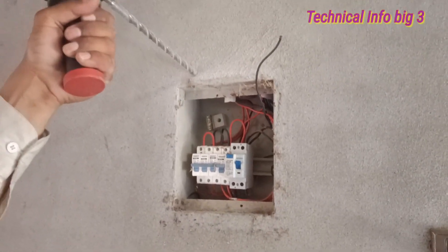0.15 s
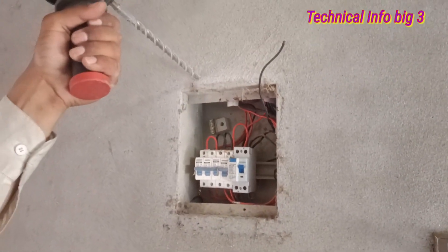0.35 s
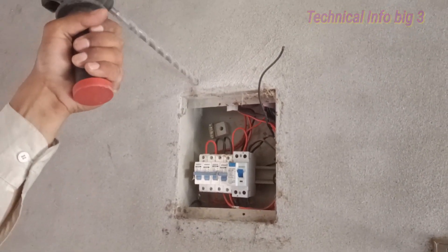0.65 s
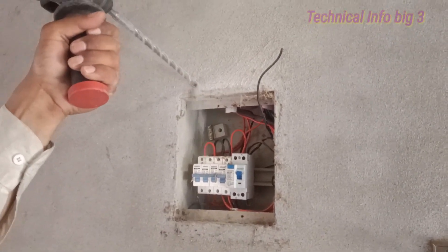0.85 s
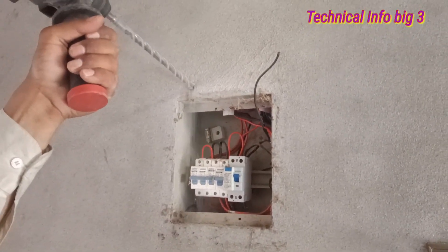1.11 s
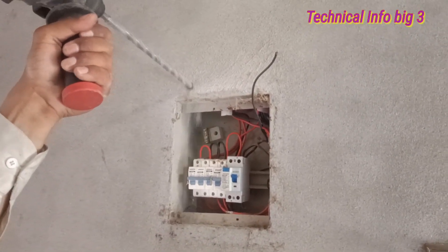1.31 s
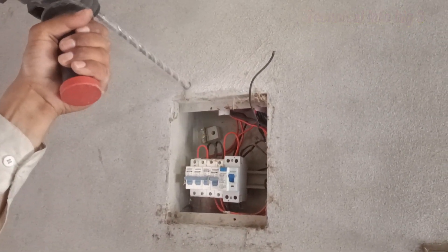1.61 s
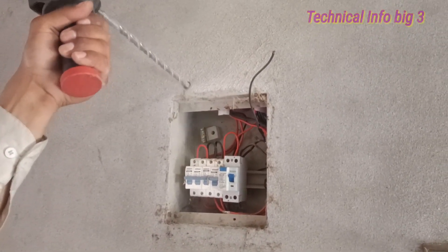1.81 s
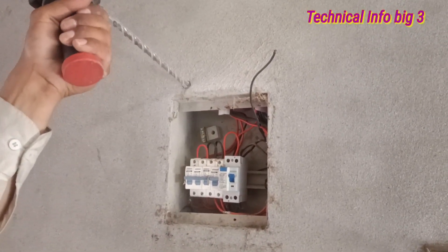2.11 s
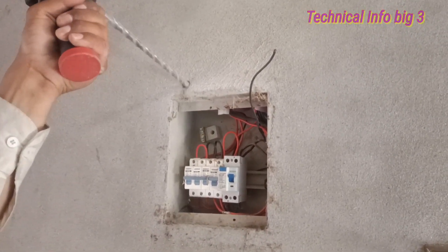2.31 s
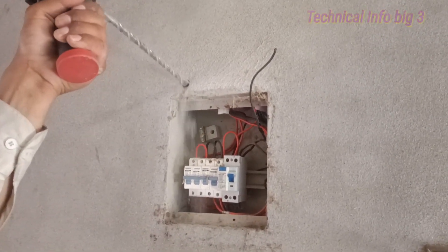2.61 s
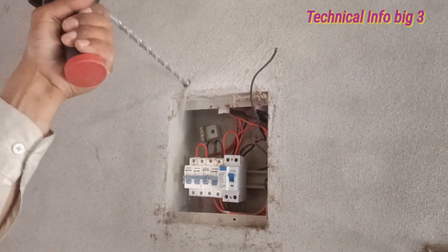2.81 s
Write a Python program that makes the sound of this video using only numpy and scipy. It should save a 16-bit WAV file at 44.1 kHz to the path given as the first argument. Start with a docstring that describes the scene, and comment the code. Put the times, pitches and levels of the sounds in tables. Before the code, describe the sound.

A rotary hammer drill revs on and off in gritty bursts, then hammers into a masonry wall.

```python
"""A gritty roar swells and sinks four times, with gear tones riding up and down inside it: a rotary hammer drill
squeezed on and off against a plaster wall, close to two microphones. A few early clicks sound; from 1.7 s the bit
meets masonry, blows crack and ring in quick succession and the wall drones. Roar, drone and rumble are coloured
noise; gears and squeal are fuzzy sines; each click or blow is a noise burst with decaying sines. Peaks clip."""
import sys
import numpy as np
from scipy import signal
from scipy.fft import rfft, irfft, next_fast_len
from scipy.io import wavfile
from scipy.ndimage import uniform_filter1d, map_coordinates

SR = 44100
rng = np.random.default_rng(int(sys.argv[2]) if len(sys.argv) > 2 else 0)


def to_wav(sig):
    """Store sig (one row per channel, or 1-D mono) as 16-bit WAV at the path in sys.argv[1].

    Samples outside -1..1 are clipped; the rate is SR.
    """
    pcm = np.clip(np.atleast_2d(sig), -1, 1) * 32767
    pcm = np.round(pcm).astype(np.int16)
    wavfile.write(sys.argv[1], SR, pcm.T)  # frames by channels


def invert_db(level):
    """Linear amplitude ratio for a level in decibels (20 dB per decade), elementwise."""
    return 10 ** (np.asarray(level, dtype=float) / 20)


N = 130095
T = np.arange(N) / SR


def unit(x):
    """Scales a signal to rms 1."""
    return x / np.sqrt(np.mean(x ** 2) + 1e-20)


def along(points, hz):
    """Interpolates (Hz, value) points on a log frequency axis."""
    point_hz, value = np.transpose(points)
    return np.interp(np.log(hz + 1), np.log(point_hz + 1), value)


def curves(rows):
    """Draws one curve over time for each column after the time."""
    time_s, *columns = np.transpose(rows)
    return [np.interp(T, time_s, column) for column in columns]


def wobble(rate):
    """A smooth random curve, rate knots a second."""
    return map_coordinates(rng.standard_normal(2000), [T * rate % 1990])


def filtered(x, response):
    """Multiplies the spectrum of x by a response of frequency."""
    size = next_fast_len(N + SR // 2)
    return irfft(rfft(x, size) * response(np.fft.rfftfreq(size, 1 / SR)), size)[..., :N]


# Likeness of the sound at the two microphones: frequency_hz, likeness (1 = identical)
LIKENESS = [(60, 1), (300, 1), (700, 0.68), (2000, 0.51), (4000, 0.27), (8000, 0.14), (15000, 0.34)]


def spread(pair, db_at):
    """Mixes two unrelated signals into a coloured left and right of rms 1, as alike as LIKENESS says."""
    def mid_side_gains(hz):
        angle = np.arccos(np.clip(along(LIKENESS, hz), 0, 1)) / 2
        return invert_db(db_at(hz)) * [np.cos(angle), np.sin(angle)]

    mid, side = filtered(pair, mid_side_gains)
    return unit(np.array([mid + side, mid - side]))


# Decay of the room: frequency_hz, t60_s
ROOM_DECAY = [(200, 0.76), (2000, 0.31), (10000, 0.13)]
ROOM_DB = -3  # tail against direct sound


def room(x):
    """Adds to the direct sound a decaying noise tail, different at each microphone."""
    hz, t, z = signal.stft(rng.standard_normal((2, SR // 2)), SR, nperseg=256)
    decay = invert_db(-60 * t / along(ROOM_DECAY, hz)[:, None])
    tail = signal.istft(z * decay, SR, nperseg=256)[1]
    tail = tail / np.linalg.norm(tail[0])
    return x + invert_db(ROOM_DB) * signal.fftconvolve(x[None], tail, axes=1)[:, :N]


GRAINS_PER_S, GRAIN_SPREAD_DB, GRAIN_SHARE = 1500, 3.5, 0.38  # share of the power


def grit(patchy_db):
    """Two noise streams with scattered grains, their gain patchy in time and frequency."""
    grains = (rng.random((2, N)) < GRAINS_PER_S / SR) * invert_db(GRAIN_SPREAD_DB * rng.exponential(size=(2, N)))
    hiss = rng.standard_normal((2, N))
    specks = unit(grains * rng.choice([-1, 1], (2, N)))
    x = np.sqrt(1 - GRAIN_SHARE) * hiss + np.sqrt(GRAIN_SHARE) * specks
    z = signal.stft(x, nperseg=512)[2]
    patches = uniform_filter1d(rng.standard_normal(z.shape[1:]), 6, 0)
    patches = uniform_filter1d(patches, 6, 1)
    return signal.istft(z * invert_db(patchy_db * unit(patches)), nperseg=512)[1][:, :N]


# Body of the roar: frequency_hz, relative density_db (per Hz)
HOUSING_COLOUR = [(88, -48), (150, -24), (362, -23.5), (465, -18), (627, -12.5), (875, -13.5), (1440, -7),
                  (1940, -8.5), (2260, -1), (2500, -5.5), (3000, -6), (3720, -10.5), (8000, -22),
                  (10400, -50), (17600, -120)]
# Housing resonances that lift roar and tones: centre_hz, width_hz, lift_db
HOUSING_RINGS = [(1770, 110, 3), (2252, 135, 4.5), (3035, 290, 3), (4520, 350, 5.5)]


def housing_db(hz):
    """Colour of the housing in dB, its resonances added as rounded peaks."""
    lifts = sum(db / (1 + (2 * (hz - centre) / width) ** 2) for centre, width, db in HOUSING_RINGS)
    return along(HOUSING_COLOUR, hz) + lifts


# Course of the tool's sound, before fixed trims in the functions:
# time_s, roar_db, fizz_over_roar_db, drone_over_roar_db
TOOL_LEVELS = [(0.0, -39, -18, 2), (0.04, -25, -18, -9), (0.06, -24, -13, -11), (0.2, -16.5, -12.5, -16),
               (0.3, -19.5, -13.5, -17), (0.34, -21.5, -12, -10), (0.57, -34, -20, -4),
               (0.64, -15.5, -13, -12.5), (0.79, -12, -10, -19), (0.91, -14, -10.5, -16),
               (1.2, -19, -15.5, -11), (1.34, -13.5, -9, -15.5), (1.35, -12.5, -11, -27),
               (1.44, -12, -8, -17.5), (1.63, -13.5, -8.5, -13), (1.68, -12.5, -12, -19),
               (1.7, -15.5, -5.5, -19), (1.73, -13.5, -10, -6.5), (1.85, -16, -9, 2.5),
               (1.91, -16, -13, -2.5), (1.96, -17.5, -8.5, 0), (2.23, -28.5, -14, -1),
               (2.27, -22.5, -14, -11.5), (2.4, -15, -9.5, -1.5), (2.58, -19, 0, 4.5), (2.95, -26, -13, -3)]
# Treble of brushes and dust: frequency_hz, relative density_db (per Hz)
FIZZ_COLOUR = [(3530, -12), (6000, 0), (7710, -16.5), (8410, 0), (9630, -6.5), (10400, -3), (10900, -2.5),
               (12200, -7.5), (14400, -16), (15500, -22)]


def motor():
    """Roar and fizz of brushes, gears and dust: gritty noise, fluttering a little."""
    roar_db, fizz_db, _ = curves(TOOL_LEVELS)
    flutter = invert_db(0.73 * wobble(11.92) + 0.61 * wobble(39.93))
    roar = spread(grit(patchy_db=1.0), housing_db) * flutter
    fizz = spread(grit(patchy_db=0.0), lambda hz: along(FIZZ_COLOUR, hz))
    fizz = fizz * invert_db(fizz_db + 0.81 * wobble(24.94))
    return invert_db(roar_db) * (invert_db(4.5) * roar + invert_db(2.0) * fizz)


# Motor speed under the trigger: time_s, strongest_gear_tone_hz
GEAR_SPEED = [(0.0, 635.6), (0.11, 1212), (0.17, 1209), (0.21, 1495), (0.48, 1020), (0.55, 767.8),
              (0.65, 1510), (0.78, 2337), (1.2, 1288), (1.31, 2042), (1.49, 2821), (1.75, 2089),
              (2.02, 1133), (2.15, 600.2), (2.23, 603.8), (2.38, 1783), (2.47, 2375), (2.58, 2356),
              (2.88, 1087), (2.95, 794.6)]
# Gear and rotor tones: multiple of the strongest tone, relative level_db (before housing and trim)
GEAR_ORDERS = [(.14, -8), (.335, -9.5), (.67, -9), (0.799, -11), (1.0, 5), (1.335, 0), (1.6, 6), (1.9, -14)]
TONE_GROWTH, TONE_WOBBLE_DB, PITCH_BLUR = 1.6, 6, 0.00404  # power of speed; flutter; relative pitch flutter


def gears():
    """Fuzzy tones tied to the speed, coloured by the housing, stronger at high speed."""
    speed_hz, = curves(GEAR_SPEED)
    tones = 0
    for multiple, db in GEAR_ORDERS:
        level_db = db + housing_db(multiple * speed_hz) + TONE_WOBBLE_DB * wobble(29.99)
        pitch_hz = multiple * speed_hz * (1 + PITCH_BLUR * wobble(60))
        tones = tones + invert_db(level_db) * np.sin(2 * np.pi * np.cumsum(pitch_hz) / SR)
    roar_db = curves(TOOL_LEVELS)[0]
    return room(tones * invert_db(roar_db - 6.5) * (speed_hz / speed_hz.max()) ** TONE_GROWTH)


# Early broadband clicks of the tool, then from 1.7 s the blows on the bit:
# start_s, hit_db (before the crack and steel trims), thud_over_hit_db (before its trim)
CLICKS_AND_BLOWS = [(0.0355, -23, -8.0), (0.474, -27, -3), (1.1563, -19.5, 1), (1.2332, -13, -6),
                    (1.736, -5, -10), (1.7694, -9, -17), (1.8005, -5, -12), (1.8378, -11, -11),
                    (1.8786, -9, -16), (1.9188, -9, -1), (1.9677, -7, -4), (2.023, -12, -9),
                    (2.0923, -12.5, -9), (2.2027, -17, 2), (2.302, -13.5, -10), (2.3522, -7, -10),
                    (2.3875, -5, 1), (2.4209, -4, -4), (2.4508, -9, 1), (2.4773, -7, -15),
                    (2.5046, -6, 5.5), (2.53, -3, -14), (2.5591, -3.5, -11), (2.5835, -4, -15),
                    (2.612, -7.5, -3), (2.6441, -5, -12), (2.678, -5, 0), (2.7154, -6.5, -6),
                    (2.7576, -8.5, -17), (2.806, -16, -12), (2.8634, -19, -12), (2.9352, -22, -8.0)]
# Ringing modes of the steel, varied a little each time: pitch_hz, relative level_db, t60_s
STEEL_MODES = [(5096, 2.5, 0.034), (8280, -2, 0.026), (8440, -3.6, 0.067), (9230, -9, 0.026),
               (10500, -8.5, 0.026), (11300, -6, 0.048), (13100, -9, 0.025)]
# Colour of the crack: frequency_hz, gain_db
CRACK_COLOUR = [(1500, -42), (4000, -8), (8000, 6), (12000, -10), (15500, -2)]
REBOUND_S, REBOUND_DB = 0.003, -8.5  # weaker second hit, varied each time
CRACK_DB, CRACK_T60_S, STEEL_DB = -1, 0.0086, -7


def clicks_and_blows():
    """Each click or blow, hit twice, is a noise crack with ringing modes; also returns the pushes into the wall."""
    steel, crack, push = np.zeros(N + SR), np.zeros(N + SR), np.zeros(N)
    t = np.arange(SR // 10) / SR
    for start_s, hit_db, thud_db in CLICKS_AND_BLOWS:
        rebound = (REBOUND_S * rng.uniform(.8, 1.5), REBOUND_DB + rng.normal(0, 2.2))
        for late_s, less_db in ((0, 0), rebound):
            i = round((start_s + late_s) * SR)
            ring = 0
            for hz, level_db, t60_s in STEEL_MODES:
                fade = invert_db(level_db + rng.normal(0, 3) - 60 * t / t60_s)
                ring = ring + fade * np.sin(2 * np.pi * hz * rng.normal(1, 0.0057) * t)
            steel[i:i + len(t)] += invert_db(hit_db + less_db + STEEL_DB) * ring
            burst_db = hit_db + less_db + CRACK_DB - 60 * t / CRACK_T60_S
            crack[i:i + len(t)] += invert_db(burst_db) * rng.standard_normal(len(t))
        push[round(start_s * SR)] = invert_db(hit_db + thud_db + 38.5)
    return steel[:N] + filtered(crack[:N], lambda hz: invert_db(along(CRACK_COLOUR, hz))), push


# A brief squeal of the bit: time_s, pitch_hz, level_db (before its trim)
BIT_SQUEAL = [(2.5, 11997, -38), (2.508, 11307, -34), (2.55, 11257, -36), (2.558, 11505, -34),
              (2.604, 11613, -25.5), (2.68, 11092, -56)]


def squeal():
    """A high tone, fuzzy in pitch and level, while the bit rubs."""
    hz, db = curves(BIT_SQUEAL)
    begin_s, end_s = BIT_SQUEAL[0][0], BIT_SQUEAL[-1][0]
    inside = np.clip(np.minimum(T - begin_s, end_s - T) / .02, 0, 1)  # 20 ms fades
    phase = 2 * np.pi * np.cumsum(hz * (1 + 0.0063 * wobble(300))) / SR
    return inside * invert_db(db + 7.0 + 3 * wobble(80)) * np.sin(phase)


# Modes of the wall and box: centre_hz, width_hz, relative level_db
WALL_MODES = [(405.3, 24.4, -8), (475, 17.4, 1.1), (501.3, 20.5, -2.5), (548, 26, -5.5), (616, 25.6, -4.5),
              (651, 45, -8), (716, 63, -13)]


def wall(push):
    """Resonant modes of the wall, driven by noise for the grinding and by a pulse for each click or blow."""
    def modes(f):
        total = 0
        for k, (centre, width, db) in enumerate(WALL_MODES):
            damping = 1j * f * width
            total = total + (-1) ** k * invert_db(db) * damping / (centre * centre - f * f + damping)
        return total

    roar_db, _, drone_db = curves(TOOL_LEVELS)
    drone = spread(filtered(rng.standard_normal((2, N)), modes), lambda hz: 0 * hz)
    drone_gain = invert_db(roar_db + drone_db - 0.5 + 2.25 * wobble(35))
    return drone_gain * drone + room(filtered(push, modes))


# Colour of the room rumble: frequency_hz, relative density_db (per Hz)
RUMBLE_COLOUR = [(12, -47), (20, -28), (139, 1.5), (173, -9), (227, 0.5), (269, -2), (350, -3.5),
                 (460, -31), (770, -120)]
RUMBLE_DB = -39.5
RUMBLE_FOLLOWS = .4  # share of the roar's swing in dB that shakes through the hand


def rumble():
    """Low noise floor of the room, partly shaken by the tool."""
    roar_db = curves(TOOL_LEVELS)[0]
    low = spread(rng.standard_normal((2, N)), lambda hz: along(RUMBLE_COLOUR, hz))
    swing_db = RUMBLE_FOLLOWS * (roar_db - roar_db.mean())
    return low * invert_db(RUMBLE_DB + swing_db + 0.69 * wobble(5.03))


def scene():
    """Sums all sources at the two microphones."""
    hits, push = clicks_and_blows()
    return motor() + gears() + room(hits + squeal()) + wall(push) + rumble()


def band_limit(x):
    """A steep low-pass at the top of the band."""
    return signal.sosfilt(signal.butter(12, 15680, fs=SR, output="sos"), x)


# Colour difference of the microphones: frequency_hz, left_over_right_db
MIC_BALANCE = [(60, 0.0), (110, 0.5), (200, -1), (380, -1), (700, -3), (1290, -1), (2380, -3.5),
               (4400, 0.5), (8120, 7), (15000, 12.5)]
LEFT_LAG_S = 0.0003024
CEILING_DBFS, HARDNESS = 1.1, 5.1  # the limiter bends peaks toward this ceiling


def record(dry):
    """The microphones differ in colour, the left hears later than the right, and peaks are squashed."""
    half = np.array([[.5], [-.5]])  # left and right each take half of the difference

    def microphones(hz):
        delay = np.exp(-2j * np.pi * hz * LEFT_LAG_S * half)
        return invert_db(half * along(MIC_BALANCE, hz)) * delay

    x = filtered(dry, microphones)
    x = x / (1 + np.abs(x / invert_db(CEILING_DBFS)) ** HARDNESS) ** (1 / HARDNESS)
    return band_limit(x)


dry = scene()
out = record(dry)
to_wav(out)
```